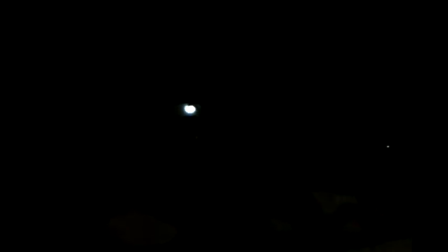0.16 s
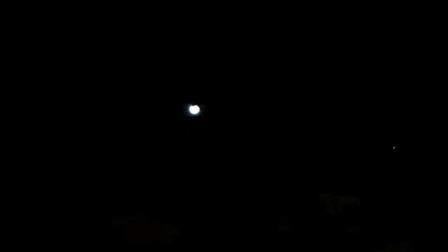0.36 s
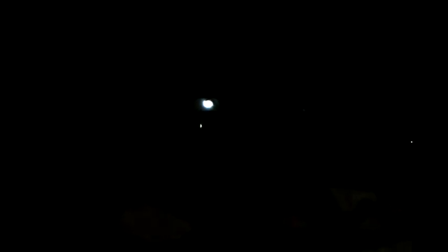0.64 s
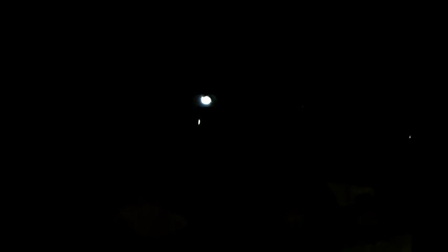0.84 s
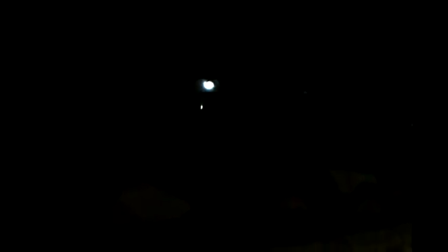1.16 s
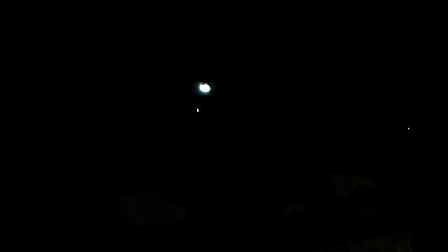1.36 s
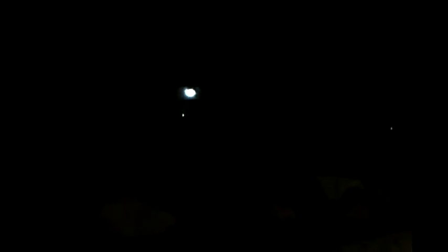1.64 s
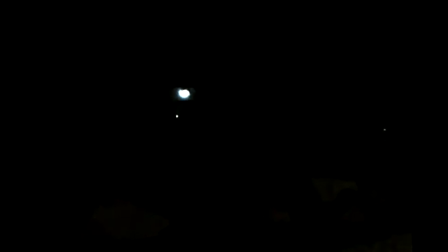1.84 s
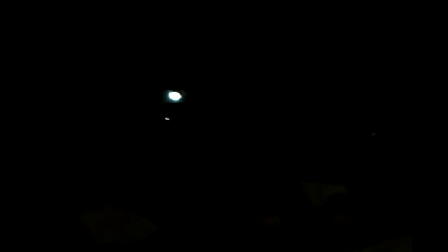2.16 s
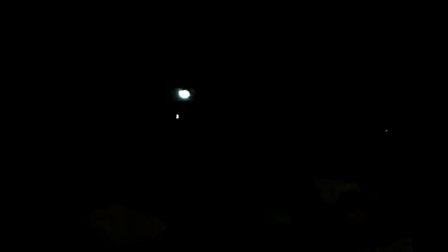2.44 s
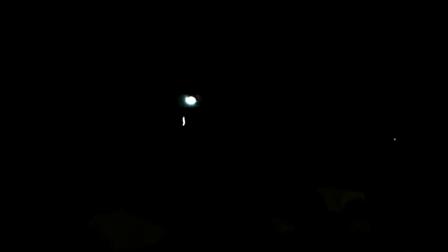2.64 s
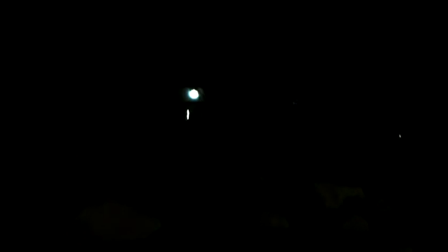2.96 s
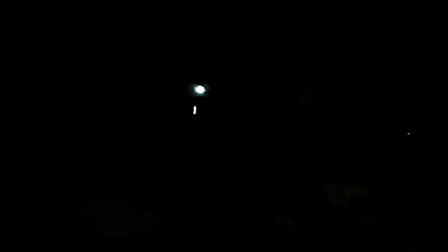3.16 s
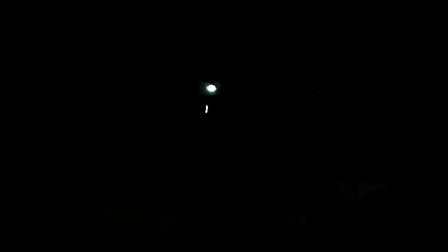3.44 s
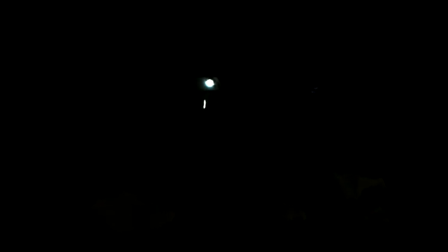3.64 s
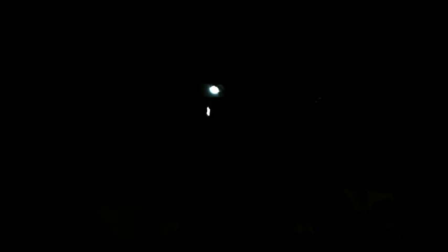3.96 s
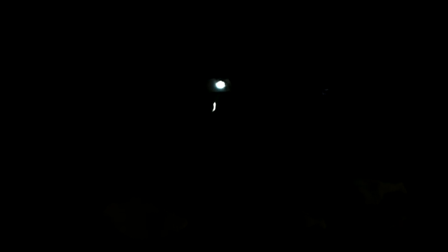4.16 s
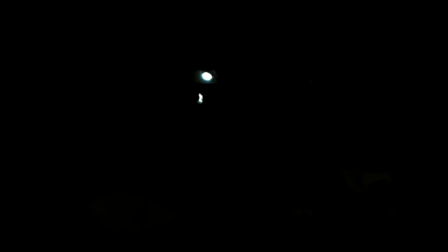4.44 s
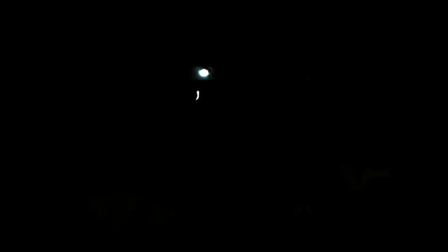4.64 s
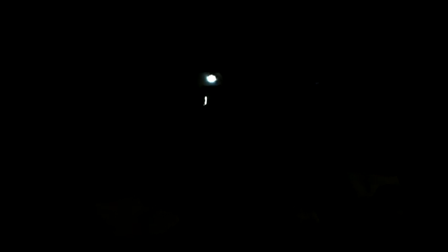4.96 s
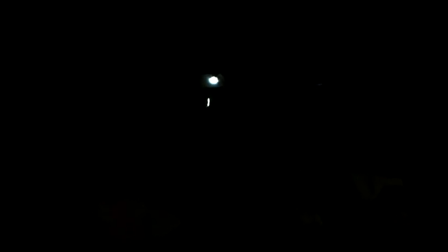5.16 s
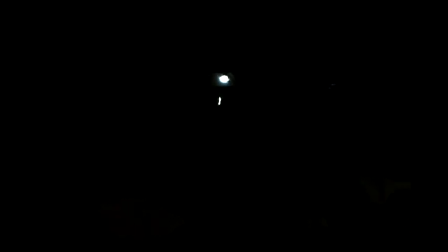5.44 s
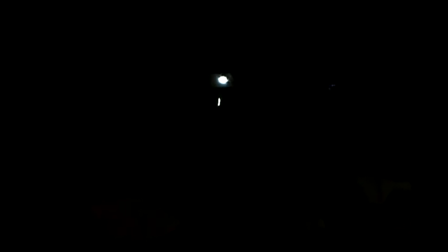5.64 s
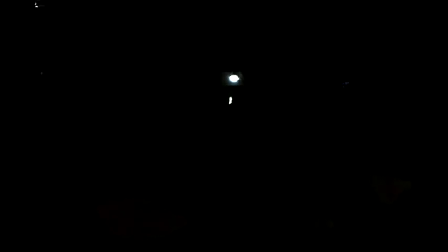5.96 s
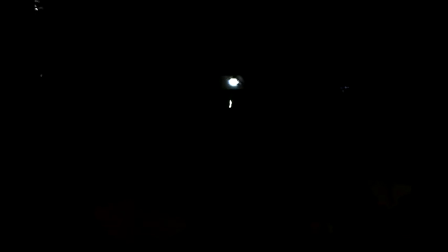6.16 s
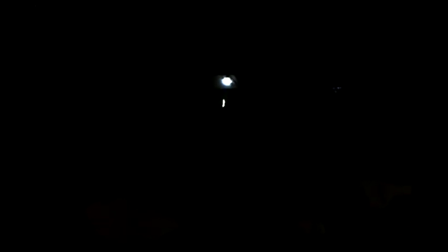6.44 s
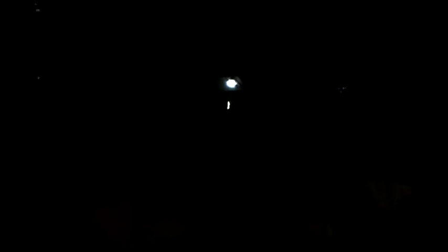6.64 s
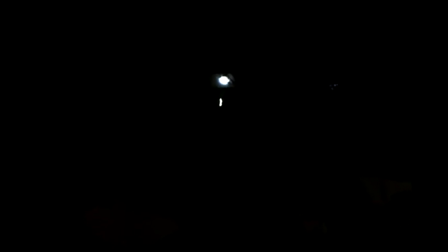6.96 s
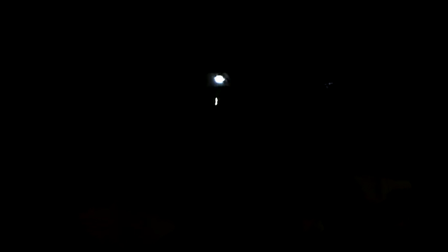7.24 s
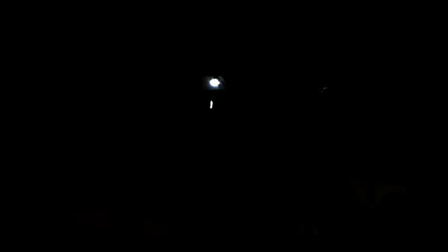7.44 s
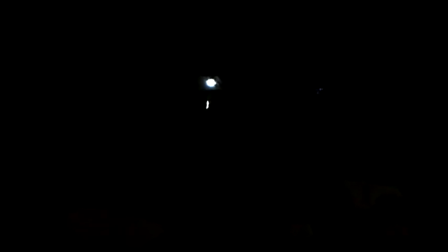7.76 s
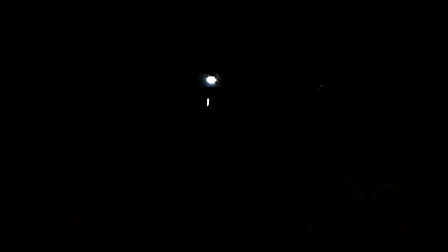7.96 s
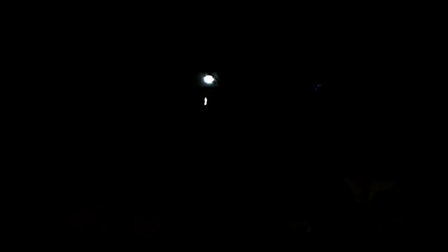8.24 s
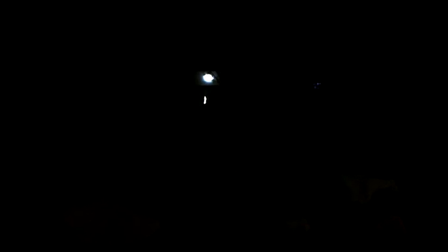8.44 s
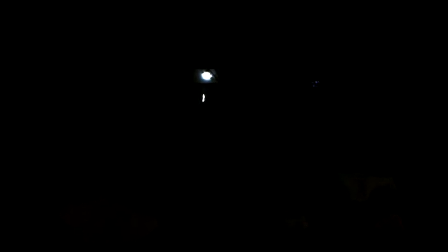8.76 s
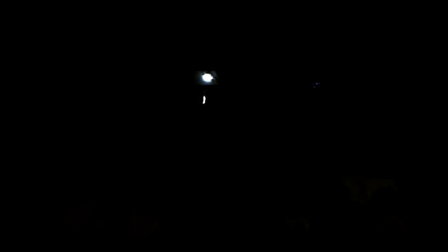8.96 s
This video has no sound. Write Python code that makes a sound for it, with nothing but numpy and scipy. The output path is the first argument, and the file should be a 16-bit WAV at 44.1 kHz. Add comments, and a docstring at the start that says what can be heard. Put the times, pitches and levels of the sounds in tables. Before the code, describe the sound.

Two frogs take turns calling at a courtyard pond at night. Each quick call is a swelling creak followed by a short accented note: a clear yelp from one frog, a raspy bark from the other. The walls add a brief echo. Sharp dry ticks and faint rustles sound right at the microphone. Near the end the frogs stop, leaving a last click and the faint hum of distant traffic.

```python
"""Two frogs trade quick two-note calls at a courtyard pond at night, then fall silent.
Each call is a swelling creak and a short accented note. The clear frog yelps with a harmonic tone
chopped by its larynx; the raspy frog barks with larynx snaps that ring its throat.
The walls answer, far traffic hums, and dry ticks and faint rustles sound right at the microphone."""
import sys
import numpy as np
from scipy import signal
from scipy.fft import rfft, irfft, next_fast_len
from scipy.io import wavfile
from scipy.ndimage import uniform_filter1d, map_coordinates

SR = 44100
rng = np.random.default_rng(int(sys.argv[2]) if len(sys.argv) > 2 else 0)


def dump_mix(stems):
    """Bounce the given channels to the path in sys.argv[1] as a 16-bit WAV at rate SR."""
    frames = np.atleast_2d(stems).T  # one column per channel
    limited = np.clip(frames, -1, 1)  # hard clip at full scale
    pcm = np.round(limited * 32767).astype(np.int16)
    wavfile.write(sys.argv[1], SR, pcm)


N = 401310

# clear frog calls: yelp_start_s, relative_level_db, nominal_pitch_hz
YELP_CALLS = [(0.244, -30, 1019), (.962, -25, 976), (1.642, -25, 1012), (2.328, -25, 998),
              (3.025, -24, 987), (3.748, -24, 996.5), (4.44, -26.5, 997), (4.96, -28.5, 981),
              (5.502, -26.5, 985), (6.293, -26, 993), (7.317, -26.5, 1001)]
# clear voice, vocal sac favours the second harmonic: harmonic_number, level_db
CLEAR_HARMONICS = [(1, -15), (2, -0.5), (3, -21.5), (4, -41), (5, -42.5), (6, -45), (7, -43)]
# clear frog throat noise: freq_hz, gain_db
BREATH_SPECTRUM = [(300, -32), (830, -1), (1400, -7.5), (1900, 4.5), (2400, -4), (2900, -2), (3300, -5.5),
                   (4600, -15.5), (6800, -21), (8000, -31)]
# raspy frog calls: bark_start_s, relative_level_db, bark_tilt_db_per_octave
BARK_CALLS = [(-.06, -36.5, 2), (.625, -32, -1), (1.309, -32, 2), (1.998, -31, 0.5), (2.693, -29.5, -1.5),
              (3.403, -30, 0), (4.098, -29.5, 2), (5.952, -30.5, 0), (6.662, -31, 1.5), (7.246, -30.5, 0.5)]
# raspy throat during the creak: freq_hz, gain_db
CREAK_SPECTRUM = [(300, -52), (800, -30.5), (1120, -19), (1300, -26.5), (1700, -12.5), (2030, 0),
                  (2270, -10.5), (2550, -17), (2880, -14.5), (3200, -27.5), (4200, -30.5), (4900, -52.5),
                  (6200, -45.5), (8000, -64)]
# raspy throat during the bark: freq_hz, gain_db
BARK_SPECTRUM = [(300, -49.5), (750, -30.5), (1080, -18), (1280, -29.5), (1750, -14), (2020, 2.5),
                 (2180, -13), (2400, -7.5), (2550, -15.5), (2920, -9.5), (3300, -28.5), (4150, -25),
                 (4550, -45.5), (8000, -56.5)]
# courtyard reflections: delay_s, gain_db
WALL_ECHOES = [(0.011, -7.5), (.043, -13), (0.06, -15.5), (.086, -19.5)]
# sharp dry ticks: start_s, peak_db
SHARP_TICKS = [(0.5766, -21), (0.7672, -31.5), (0.8962, -21.5), (1.216, -15.5), (1.3952, -26.5),
               (1.6793, -26), (1.8414, -24), (2.3496, 1), (2.5198, -17), (2.5481, -16.5), (2.6178, -21),
               (2.8114, -16.5), (2.9316, -9), (3.1073, -22), (3.277, -21), (3.3313, -24.5), (3.421, -13),
               (3.8571, -22), (4.3705, -16), (4.4963, -26), (4.804, -25.5), (4.9734, -19.5), (5.311, -7),
               (5.4543, -12), (5.7431, -12.5), (7.3288, -19), (7.5598, -18.5), (7.895, -2.5)]
# flurries of faint ticks: start_s, length_s, mean_peak_db
TICK_FLURRIES = [(3.072, .06, -30.5), (3.64, .08, -36.5)]
# tick resonance: freq_hz, gain_db
TICK_SPECTRUM = [(200, -39), (1800, -30.5), (2500, -20.5), (3000, -10), (3800, 1.5), (4500, 3), (5600, -4),
                 (6800, -7.5), (7800, -27.5)]
# rustles near the microphone: start_s, length_s, level_db
RUB_STROKES = [(0, .75, -61), (0.196, .068, -51.5), (.571, 0.14, -57.5), (0.755, 0.067, -51.5),
               (0.891, 0.068, -51), (1.387, 0.045, -57), (2.605, .091, -46), (2.919, 0.19, -52)]
# friction noise: freq_hz, gain_db
RUB_SPECTRUM = [(1000, -31), (2500, -12.5), (3800, 0.5), (5000, 1), (6800, -3), (8000, -5.5)]
# far traffic over time: time_s, relative_rumble_db, relative_tyre_db
TRAFFIC_LEVELS = [(0.0, -55.5, -52.5), (0.68, -54.5, -56.5), (0.96, -55.5, -53), (4.26, -51.5, -47),
                  (5.55, -51.5, -46.5), (7.96, -51, -49.5), (9.1, -52.5, -47)]
# road rumble: freq_hz, gain_db
RUMBLE_SPECTRUM = [(20, -58), (35, -44.5), (55, -23), (75, -15), (100, -5), (125, 0.5), (170, -2),
                   (250, -2), (380, -10.5), (600, -16.5), (1200, -41), (3000, -90)]
# tyre wash: freq_hz, gain_db
TYRE_SPECTRUM = [(150, -27.5), (400, -6), (700, -1.5), (1000, 2.5), (1500, -4.5), (2000, -10), (2800, -19),
                 (4000, -25), (5500, -29.5), (7000, -32.5), (8000, -42)]
# far engines: start_s, length_s, mid_firing_hz, glide_hz_per_s, level_db
ENGINE_PASSES = [(0, 0.41, 138.5, 23.5, -50.5), (1.68, 1.08, 133.5, 20, -46.5),
                 (5.4, .9, 158.7, -15.5, -49.5), (5.45, 1, 60, -1, -64), (5.1, 1.77, 124.8, -7, -51.5),
                 (6.501, 2, 105.5, -8, -55), (7.05, 1.45, 131.1, 0, -48.5)]


def clear_frog():
    """A pulsed creak that climbs in pitch, then a loud, nearly pure yelp with a rough start."""
    out, t = np.zeros(N), np.arange(SR // 6) / SR
    lead_s, tail_reference_db = .162, -23.5
    for start_s, level_db, yelp_hz in YELP_CALLS:
        # direct level changes as the frog turns; the diffuse tail keeps its level
        tail_db = tail_reference_db - level_db
        climb_hz = 934.3 * (1 + .8 * (np.minimum(t, .11) - .072))
        creak = clear_note(climb_hz, pulse_hz=110, depth=.79, sharpness=3.4,
                           waver=.027, slip_rad=.62, breath_db=-18.5)
        creak = pond_bank(creak, scatter_db=-1, decay_s=.0044)
        creak *= swell(t, length_s=.093, rise_db=16, crest_s=.052, release_s=.005)
        creak = courtyard(creak, early_db=tail_db - 10.5, late_db=tail_db - 16)
        add(out, start_s - lead_s, amp(level_db - 4.5) * creak)

        lift_hz = yelp_hz * (1.008 + .75 * (np.minimum(t, .04) - .015))
        yelp = clear_note(lift_hz, pulse_hz=102, depth=.6, sharpness=1.5,
                          waver=.016, slip_rad=.31, breath_db=-10.5 - 460 * t)
        yelp *= accent(t, length_s=.033, attack_s=.0009, arch_db=4, release_s=.0023)
        yelp = courtyard(yelp, early_db=tail_db - 11, late_db=tail_db - 17.5)
        add(out, start_s, amp(level_db + .5) * yelp)
    return out


def clear_note(pitch_hz, pulse_hz, depth, sharpness, waver, slip_rad, breath_db):
    """Vocal cords sing a harmonic tone while the larynx chops it into pulses."""
    n = len(pitch_hz)
    cycles = .12 + np.cumsum(pulse_hz * (1 + .07 * wobble(60, n))) / SR
    pulses = np.abs(np.sin(np.pi * cycles)) ** sharpness
    gate = unit((1 - depth * (1 - pulses)) * amp(1.1 * wobble(110, n)))
    phase = 2 * np.pi * np.cumsum(pitch_hz * (1 + waver * wobble(400, n))) / SR
    # cords restart slightly out of step at each pulse
    phase += slip_rad * uniform_filter1d(rng.standard_normal(n)[cycles.astype(int)], size=110)
    tone = sum(amp(db) * np.sin(k * phase + rng.uniform(0, 2 * np.pi)) for k, db in CLEAR_HARMONICS)
    return gate * (unit(tone) + amp(breath_db) * noise(BREATH_SPECTRUM, n))


def raspy_frog():
    """A dry, rattling creak, then a brighter bark of faster, more ragged snaps."""
    out, t = np.zeros(N), np.arange(SR // 6) / SR
    lead_s, vocal_sac_hz = .146, 2020
    for start_s, level_db, tilt_db_per_octave in BARK_CALLS:
        creak = raspy_note(t, CREAK_SPECTRUM, snap_hz=119, jitter=.025, spread_db=1, rattle=2.6)
        creak = pond_bank(creak, scatter_db=-5.5, decay_s=.015)
        creak *= swell(t, length_s=.081, rise_db=14, crest_s=.051, release_s=.0079)
        creak = courtyard(creak, early_db=-9, late_db=-17.5)
        add(out, start_s - lead_s, amp(level_db - .96) * creak)

        throat = [(hz, db + tilt_db_per_octave * np.log2(hz / vocal_sac_hz)) for hz, db in BARK_SPECTRUM]
        bark = raspy_note(t, throat, snap_hz=150, jitter=.12, spread_db=.5, rattle=1.5)
        bark = pond_bank(bark, scatter_db=-5.5, decay_s=.005)
        bark *= accent(t, length_s=.037, attack_s=.0006, arch_db=4.5, release_s=.0033)
        bark = courtyard(bark, early_db=-10.5, late_db=-15)
        add(out, start_s, amp(level_db + 2) * bark)
    return out


def raspy_note(t, throat, snap_hz, jitter, spread_db, rattle, rattle_decay_s=.004):
    """Snaps of the larynx, each with a brief rattle, ring the throat."""
    n = len(t)
    gap_draw, level_draw = rng.standard_normal((64, 2)).T
    gaps_s = np.maximum(1 + jitter * gap_draw, .2) / snap_hz
    onsets_s = np.cumsum(gaps_s) - gaps_s[0] + .001
    snaps = np.bincount((onsets_s * SR).astype(int), amp(spread_db * level_draw), n)[:n]
    decay = np.exp(-t / rattle_decay_s)
    flutter = signal.fftconvolve(snaps, decay / np.linalg.norm(decay))[:n] * rng.standard_normal(n)
    voice = signal.fftconvolve(snaps + rattle * flutter, ring(throat))[:n]
    # steady air pressure gives each snap about the same energy
    power = np.abs(uniform_filter1d(voice ** 2, size=int(1.5 * SR / snap_hz)))
    return voice / np.sqrt(power + 1e-12)


def swell(t, length_s, rise_db, crest_s, release_s):
    """Air pressure in a creak: grows to a crest, holds, cuts off."""
    rise = amp(-rise_db * np.clip(1 - t / crest_s, 0, 1))
    return rise * np.exp(-np.maximum(t - length_s, 0) / release_s)


def accent(t, length_s, attack_s, arch_db, release_s):
    """Air pressure in the second note: sudden start, short arch."""
    arch = amp(-arch_db * (2 * np.minimum(t / length_s, 1) - 1) ** 2)
    return (1 - np.exp(-t / attack_s)) * arch * np.exp(-np.maximum(t - length_s, 0) / release_s)


def pond_bank(note, scatter_db, decay_s):
    """Stones and leaves around the frog smear its pulses over milliseconds."""
    t = np.arange(SR // 30) / SR
    scatter = rng.standard_normal(len(t)) * np.exp(-t / decay_s)
    response = amp(scatter_db) * scatter / np.linalg.norm(scatter)
    response[0] = 1
    return unit(signal.fftconvolve(note, response)[:len(note)])


def courtyard(note, early_db, late_db, early_t60_s=.41, late_t60_s=.86):
    """Wall echoes and a diffuse tail, slightly different per note as the frog shifts."""
    t = np.arange(SR * 3 // 4) / SR
    build_up = 1 - np.exp(-t / .02)
    response = np.zeros(len(t))
    for level_db, t60_s in (early_db, early_t60_s), (late_db, late_t60_s):
        tail = rng.standard_normal(len(t)) * amp(-60 * t / t60_s) * build_up
        response += amp(level_db) * tail / np.linalg.norm(tail)
    response[0] = 1
    for delay_s, gain_db in WALL_ECHOES:
        response[int(abs(delay_s + rng.normal(0, .001)) * SR)] += amp(gain_db)
    return signal.fftconvolve(note, response)


def ticks(per_flurry=4, spread_db=5):
    """Single sharp impulses and flurries of faint ones, too near to echo."""
    out = np.zeros(N)
    tick = ring(TICK_SPECTRUM)
    tick /= np.abs(tick).max()
    faint = [(start_s + length_s * rng.uniform(), rng.normal(mean_db, spread_db))
             for start_s, length_s, mean_db in TICK_FLURRIES for _ in range(per_flurry)]
    for start_s, peak_db in list(SHARP_TICKS) + faint:
        add(out, start_s, amp(peak_db) * tick)
    return out


def rubs():
    """Faint strokes of grainy friction, as of a hand shifting its grip."""
    out = np.zeros(N)
    for start_s, length_s, level_db in RUB_STROKES:
        n = int(length_s * SR)
        stroke = signal.windows.tukey(n, .5) * unit(amp(2.5 * wobble(350, n)))
        add(out, start_s, amp(level_db) * stroke * noise(RUB_SPECTRUM, n))
    return out


def roads():
    """Far roads: low rumble and tyre wash, drifting in level."""
    t = np.arange(N) / SR
    time_s, rumble_db, tyre_db = np.transpose(TRAFFIC_LEVELS)
    rumble = amp(np.interp(t, time_s, rumble_db) + 3.5 + .7 * wobble(6, N)) * noise(RUMBLE_SPECTRUM, N)
    tyres = amp(np.interp(t, time_s, tyre_db) - .2 + .87 * wobble(5, N)) * noise(TYRE_SPECTRUM, N)
    return rumble + tyres


def engines(rev_hz=3.5, fade_share=.42):
    """Far engines hum at their firing rate: swell, glide, rev slightly midway, fade."""
    out = np.zeros(N)
    for start_s, length_s, mid_hz, glide_hz_per_s, level_db in ENGINE_PASSES:
        n = int(length_s * SR)
        from_mid_s = np.arange(n) / SR - length_s / 2
        firing_hz = mid_hz + glide_hz_per_s * from_mid_s - rev_hz * (2 * from_mid_s / length_s) ** 2
        phase = 2 * np.pi * np.cumsum(firing_hz * (1 + .01 * wobble(14, n))) / SR
        envelope = signal.windows.tukey(n, fade_share) * amp(level_db + 2 * wobble(11, n))
        add(out, start_s, envelope * (np.sin(phase) + amp(-15) * np.sin(2 * phase)))
    return out


def amp(db):
    """Decibels to gain."""
    return 10 ** (np.asarray(db) / 20)


def unit(x):
    """Scale to rms 1."""
    return x / np.sqrt(np.mean(x ** 2) + 1e-20)


def gains(spectrum, size):
    """(freq_hz, gain_db) points to gains on an FFT grid."""
    hz, db = np.transpose(spectrum)
    return amp(np.interp(np.log(np.fft.rfftfreq(size, 1 / SR) + 1), np.log(hz), db))


def noise(spectrum, n):
    """Coloured noise of rms 1."""
    size = next_fast_len(n + 8192)
    return unit(irfft(rfft(rng.standard_normal(size)) * gains(spectrum, size), size)[:n])


def ring(spectrum, size=2048):
    """Minimum-phase impulse response of a spectrum."""
    cepstrum = irfft(np.log(gains(spectrum, size)))
    cepstrum[1:size // 2] *= 2
    cepstrum[size // 2 + 1:] = 0
    return irfft(np.exp(rfft(cepstrum)))


def wobble(knots_per_s, n):
    """Smooth random curve."""
    knots = rng.standard_normal(int(n * knots_per_s / SR) + 4)
    return map_coordinates(knots, [np.arange(n) * knots_per_s / SR])


def add(track, start_s, x):
    """Mix x into the track; start_s may be negative."""
    start = round(start_s * SR)
    x = x[max(-start, 0):]
    part = track[max(start, 0):][:len(x)]
    part += x[:len(part)]


def scene():
    """Both frogs, small noises at the microphone, far traffic; mono."""
    return (clear_frog() + raspy_frog() + ticks() + rubs() + roads() + engines())[None]


def record(dry):
    """Cut the highs, clip at full scale, add a very faint steady hiss."""
    cutoff_hz, hiss_db, top_hz = 7250, -92.5, 15500
    size = next_fast_len(N + SR // 2)
    hz = np.fft.rfftfreq(size, 1 / SR)
    lowpass = 1 / np.sqrt(1 + (hz / cutoff_hz) ** 80)
    heard = np.clip(irfft(rfft(dry, size) * lowpass, size)[:, :N], -1, 1)
    heard += amp(hiss_db) * rng.standard_normal(heard.shape)
    return irfft(rfft(heard, size) * (hz < top_hz), size)[:, :N]


dry = scene()
out = record(dry)
dump_mix(out)
```